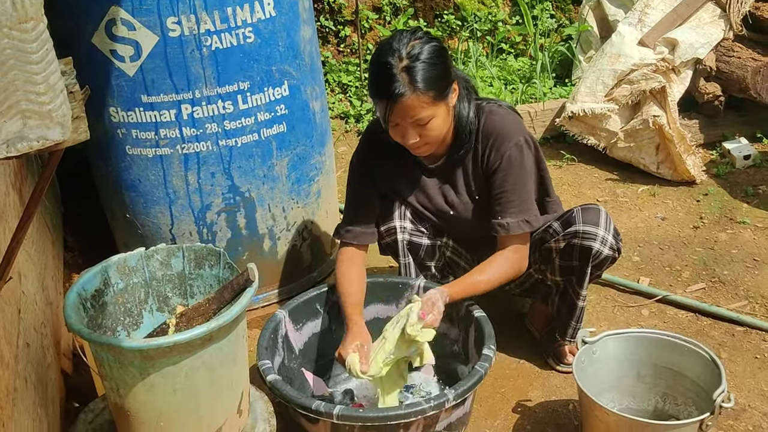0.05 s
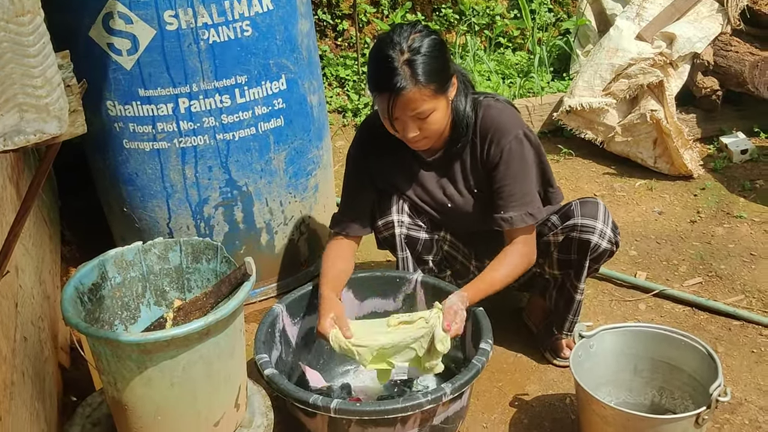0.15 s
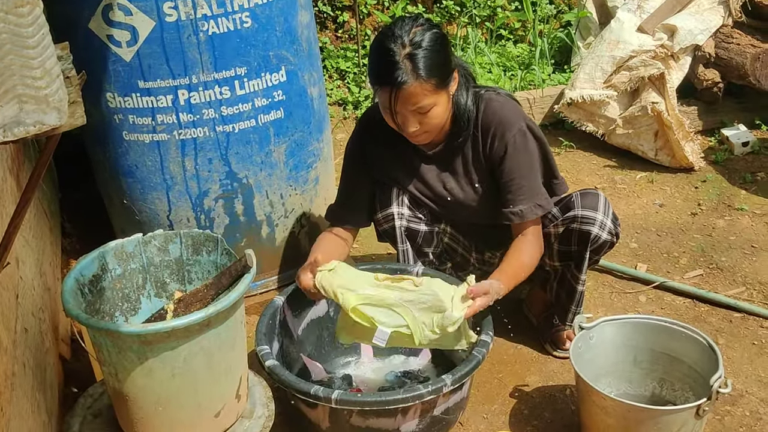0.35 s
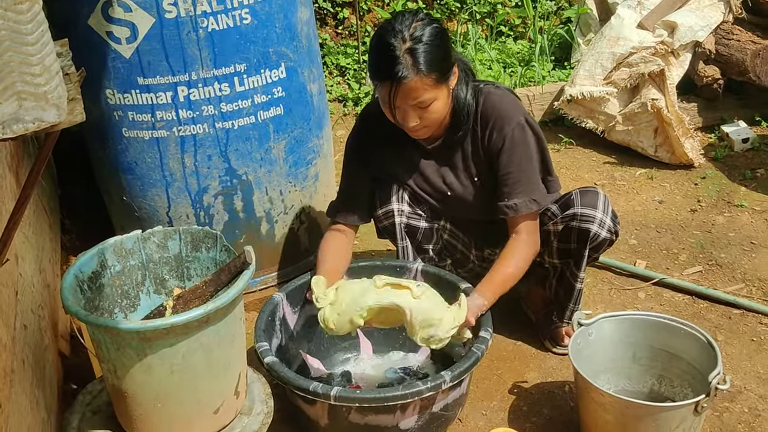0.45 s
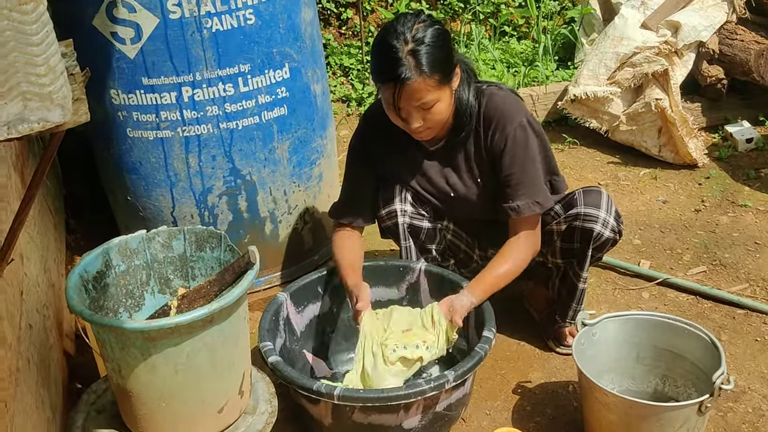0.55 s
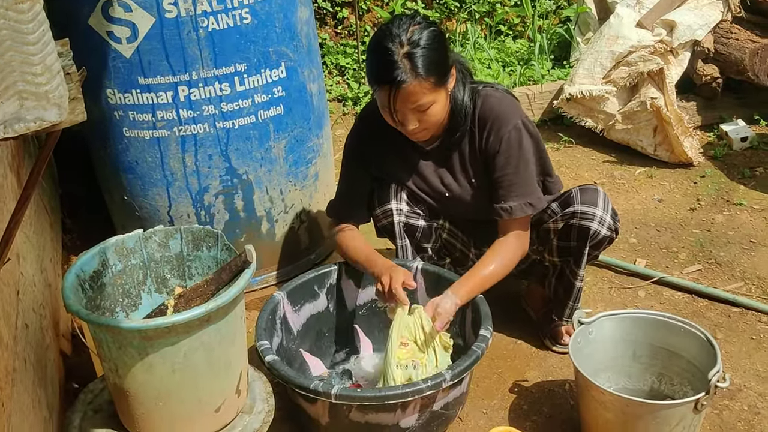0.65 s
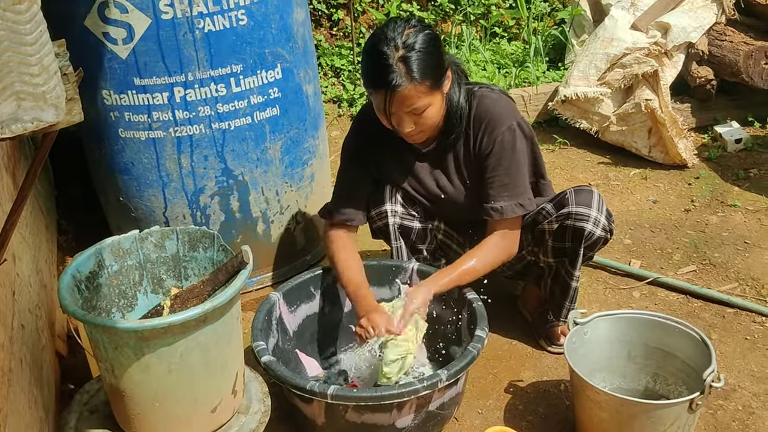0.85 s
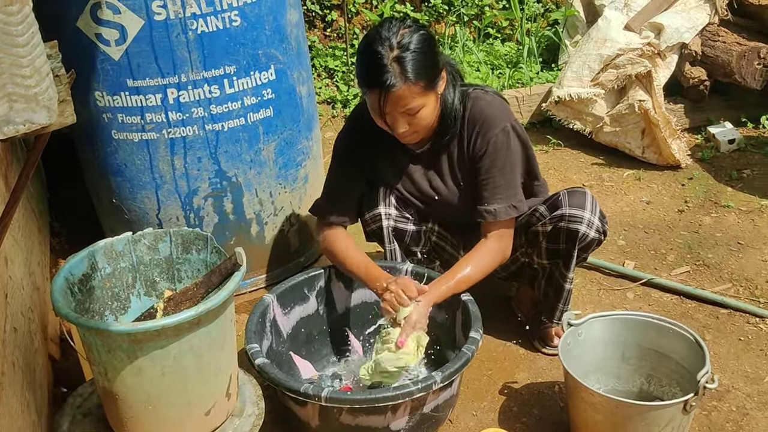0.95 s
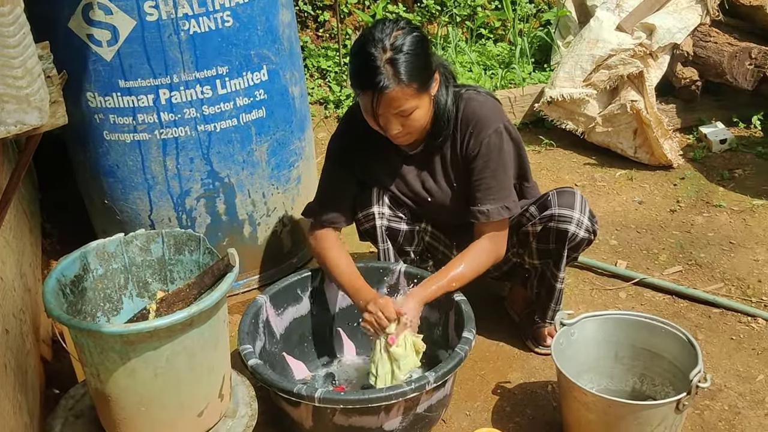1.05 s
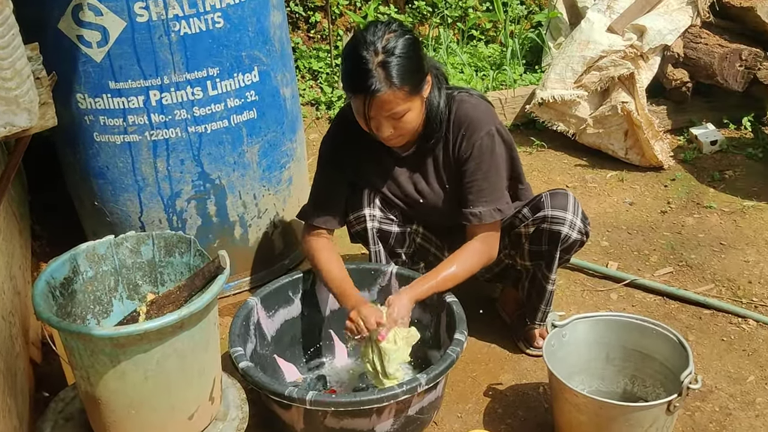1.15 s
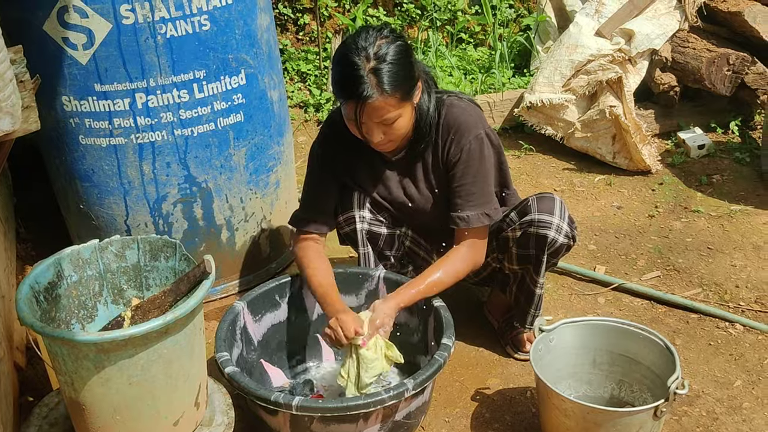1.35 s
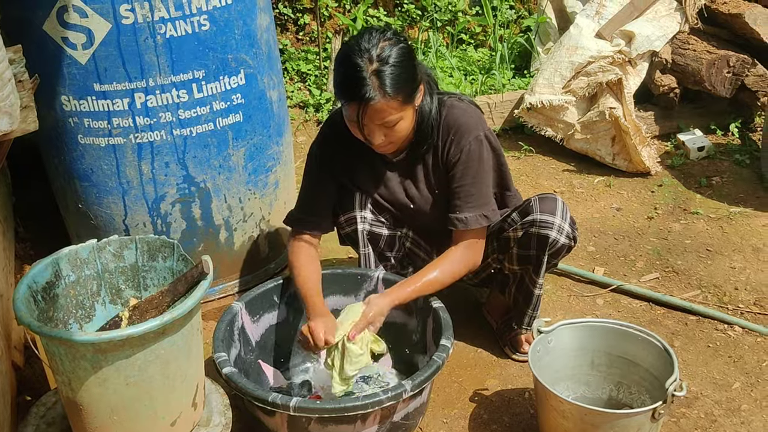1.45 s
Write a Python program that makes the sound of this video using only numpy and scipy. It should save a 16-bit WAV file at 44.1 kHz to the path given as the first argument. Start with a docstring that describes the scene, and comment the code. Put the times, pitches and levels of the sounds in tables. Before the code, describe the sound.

Hand washing of cloth in a plastic basin, with quick wet squelches and popping foam.

```python
"""A wet cloth is opened out, then scrubbed by hand in a plastic basin of suds, outdoors.
Each stroke squeezes out a squelch of tiny bursting bubbles and a fizz of foam, and rings the basin.
Larger bubbles snap, water squirts through the folds and slops underneath. Early on, a puff of air
buffets the left microphone port. A far engine drones under a soft outdoor hiss."""
import sys
import numpy as np
from scipy import signal
from scipy.fft import rfft, irfft, next_fast_len
from scipy.io import wavfile
from scipy.ndimage import map_coordinates

SR = 44100
rng = np.random.default_rng(int(sys.argv[2]) if len(sys.argv) > 2 else 0)


def materialize(psi):
    """Save the field psi as 16-bit PCM at rate SR to the path in sys.argv[1].

    A 1-D psi becomes a single channel; in a 2-D psi each row is a channel.
    """
    bounded = np.clip(np.atleast_2d(psi).T, -1, 1)
    quanta = np.round(bounded * 32767).astype(np.int16)
    wavfile.write(sys.argv[1], SR, quanta)


N = 66150
T = np.arange(N) / SR
FFT_SIZE = 2 * next_fast_len(N)
BUBBLES_PER_S = 3500


def amp(db):
    """Decibels to gain."""
    return 10 ** (np.asarray(db) / 20)


def unit(x):
    """Scale to rms 1."""
    return x / np.sqrt(np.mean(x ** 2) + 1e-20)


def fader(rows):
    """A gain ride through (time [s], level [dB]) points."""
    return amp(np.interp(T, *np.transpose(rows)))


def wobble(knots_per_s):
    """A smooth random drift."""
    return map_coordinates(rng.standard_normal(400), [T * knots_per_s], mode="wrap")


def swell(peak, rise, fall):
    """A smooth attack to 1 at the peak time, then a decay of 20 dB per fall time."""
    return np.where(T < peak, np.exp(-2 * ((T - peak) / rise) ** 2), amp(-20 * np.abs(T - peak) / fall))


def swells(rows, column):
    """One swell a row, at the level in the given column, summed in power."""
    return np.sqrt(sum((amp(row[column]) * swell(*row[:3])) ** 2 for row in rows))


def pops(per_s, spread_db):
    """Bubbles bursting at random moments with uneven sizes, rms 1."""
    size = amp(spread_db * np.clip(rng.standard_normal(N), -2, 2))
    return unit((rng.random(N) < per_s / SR) * size * rng.choice([-1, 1], N))


def ring(x, hz, width_hz):
    """One resonance with a gain of 1 at its centre."""
    return signal.lfilter(*signal.iirpeak(hz, hz / width_hz, fs=SR), x)


def eq(x, rows):
    """Minimum-phase EQ: white input of rms 1 takes on the rows' dB/Hz, one channel per level column."""
    hz, *channels = np.transpose(rows)
    log_hz = np.log(np.fft.rfftfreq(FFT_SIZE, 1 / SR) + 1)
    gain = amp([np.interp(log_hz, np.log(hz), db) for db in channels])
    cepstrum = irfft(np.log(gain), FFT_SIZE)
    cepstrum[:, 1:FFT_SIZE // 2] *= 2
    cepstrum[:, FFT_SIZE // 2 + 1:] = 0
    return irfft(rfft(x, FFT_SIZE) * np.exp(rfft(cepstrum)), FFT_SIZE)[:, :N] * np.sqrt(SR / 2)


def basin_scatter(x, wet_db, spots=2, t60_s=0.024):
    """Bubbles lie at several spots, each with its direct sound and a short scatter off the basin wall."""
    t = T[:SR // 20]
    response = rng.standard_normal((spots, 2, len(t))) * amp(-60 * t / t60_s)
    response *= amp(wet_db) / np.linalg.norm(response, axis=2, keepdims=True)
    response[:, :, 0] += [amp(-7.5), 1]  # direct sound: the left port faces away from the basin
    response /= np.linalg.norm(response, axis=2, keepdims=True)
    sends = x * (rng.integers(spots, size=N) == np.arange(spots)[:, None])
    return signal.fftconvolve(sends[:, None], response, axes=2).sum(axis=0)[:, :N]


def suction(start, width):
    """The pressure dip of one eddy passing the port, with a 35 Hz low cut."""
    age = np.maximum(T - start, 0) / width
    return signal.lfilter(*signal.butter(1, 35, "high", fs=SR), -age * np.exp(1 - age))


# scrubbing strokes (peak time [s], rise [s], fall [s], basin ring [dB], squelch [dB], foam [dB])
STROKES = [(.512, 0.015, 0.025, -10, -10.5, -11), (.641, 0.018, 0.027, -20, -3, -8.5),
           (.720, 0.017, 0.048, 2, -4, -24), (.746, 0.013, 0.047, -13, 2, -1),
           (.772, .008, 0.022, -4, -0.5, 0.5), (.782, 0.0023, 0.04, 10, 4, 4),
           (0.819, 0.028, 0.031, -10, 2, -10), (.85, 0.028, 0.043, -15, -11, -9),
           (0.923, 0.028, 0.039, 1.5, -5.5, -5), (.945, 0.021, 0.044, 1, 1, -1),
           (.992, .02, 0.081, -28, -17, -11), (1.030, 0.016, .025, -4, 0.5, -5),
           (1.057, 0.029, 0.041, -1, 1.5, -2.5), (1.085, 0.016, 0.017, -20, -1, 1),
           (1.195, 0.044, 0.023, -13, -10, -4), (1.220, 0.035, .035, -11, -3, -6),
           (1.302, 0.02, 0.1, -28, -5.5, -5), (1.357, 0.021, .035, -25, -13, -1.5),
           (1.43, 0.035, 0.098, -11, -18, -10.5), (1.495, 0.034, 0.028, -23, -14.5, -10)]
# suds settling (time [s], level [dB])
SUDS_FADER = [(0, -10.5), (.1, -19), (.25, -11), (.4, -17.5), (.6, -17.5), (.7, -12.5), (1.1, -13),
              (1.5, -13.5)]
# bright sizzle of foam (frequency [Hz], left [dB/Hz], right [dB/Hz])
FOAM_EQ = [(2080, -110, -110), (4360, -88.5, -88), (5500, -86.5, -74.5), (6240, -83, -67),
           (6570, -83, -64.5), (7670, -95, -71), (8360, -89, -82), (11100, -101, -91), (15000, -103, -99)]


def foam():
    """Foam bursts under each stroke, and the suds keep fizzing in between."""
    envelope = np.hypot(swells(STROKES, column=5), fader(SUDS_FADER))
    fizz = envelope * pops(per_s=2000, spread_db=7)
    return eq(basin_scatter(fizz, wet_db=3.5), FOAM_EQ)


# open-air bed (frequency [Hz], left [dB/Hz], right [dB/Hz])
OUTDOOR_EQ = [(20, -97, -70), (73, -78, -69), (131, -81, -78), (320, -83, -86), (507, -91.5, -89),
              (1400, -94.5, -93), (2220, -92.5, -88.5), (4600, -93.5, -95.5), (6360, -86.5, -98),
              (7530, -89.5, -88.5), (8550, -99, -97), (14600, -103, -104)]


def outdoor_hiss():
    """A soft, wide bed of steady open-air noise."""
    return eq(rng.standard_normal((2, N)), OUTDOOR_EQ)


# low engine orders (frequency [Hz], rms level on the right [dB])
ENGINE_ORDERS = [(56, -51), (83, -59.5), (197, -64.5)]


def far_engine():
    """The low orders of a far engine drone, wavering in level and phase."""
    drone = np.zeros(N)
    for hz, db in ENGINE_ORDERS:
        gain = np.sqrt(2) * amp(db + 2.56 * wobble(6.07))
        drone += gain * np.sin(2 * np.pi * hz * T + 0.73 * wobble(5.93))
    return drone * amp([[-1], [0]])


# dull bumps of air (time [s], width [s], level [dB])
AIR_BUMPS = [(.004, 0.0044, -21), (0.051, 0.0036, -28.5), (.203, 0.00056, -24), (.237, 0.0026, -8),
             (0.254, 0.0039, -11.5)]


def air_bumps():
    """Single eddies thump the port before the puff and as it builds."""
    return sum(amp(db) * suction(start, width) for start, width, db in AIR_BUMPS)


# wet snaps, levels before the boost (time [s], tick [dB], body [dB])
SNAPS = [(0.067, -8.5, -16.5), (0.123, -18, -10), (.6355, -2, -22), (0.7411, 3.5, -7), (.7515, 0.5, -12),
         (0.7786, 5, 7), (.781, 3.5, -6), (.8182, -2, 2), (.8222, -4.5, 1), (0.9326, 5.5, -26),
         (1.052, -8, -3), (1.176, -5, -20), (1.1882, 6, -5), (1.1912, 3, -7), (1.2524, -9, -13),
         (1.293, -2, -4)]


def snaps(boost_db=22):
    """Larger bubbles burst in the open: a tick with the foam's tone, a body with the squelch's."""
    ticks, bodies = np.zeros((2, N))
    for time, tick_db, body_db in SNAPS:
        ticks[round(time * SR)] += amp(tick_db + boost_db)
        bodies[round(time * SR)] += amp(body_db + boost_db)
    return eq(basin_scatter(ticks, wet_db=2), FOAM_EQ) + eq(basin_scatter(bodies, wet_db=2), SQUELCH_EQ)


# spurts (peak time [s], rise [s], fall [s], pitch [Hz], level [dB], left minus right [dB])
SQUIRTS = [(.068, 0.002, 0.017, 2320, -47, -8), (.069, .003, 0.013, 5500, -62, 6),
           (.86, 0.022, 0.084, 2590, -59, 7), (1.294, 0.0059, 0.066, 4700, -40.5, 0.5),
           (1.353, 0.024, 0.066, 2600, -45.5, 2), (1.46, 0.06, 0.16, 2670, -53.5, 7.5)]


def squirts(q=5.3):
    """Water squirts through a fold; like-sized bubbles give each spurt its own pitch."""
    out = np.zeros((2, N))
    for peak, rise, fall, hz, db, pan_db in SQUIRTS:
        spray = np.array([unit(ring(pops(BUBBLES_PER_S, spread_db=0.5), hz, hz / q)) for _ in range(2)])
        out += spray * swell(peak, rise, fall) * amp([[db + pan_db / 2], [db - pan_db / 2]])
    return out


# water slopping (peak time [s], rise [s], fall [s], level [dB])
SLOPS = [(.125, 0.009, 0.028, 7.5), (.535, 0.12, 0.064, -2.5), (0.578, 0.016, 0.013, 1.5),
         (0.639, 0.0069, 0.023, -3.5), (.805, 0.037, 0.015, -7), (1.042, 0.0096, 0.0096, -6),
         (1.435, 0.089, 0.023, -9.5)]
# dark tone of a slop (frequency [Hz], left [dB/Hz], right [dB/Hz])
SLOP_EQ = [(100, -100, -100), (217, -75, -90), (296, -74.5, -68), (424, -80.5, -83.5), (700, -84, -91),
           (2000, -110, -110)]


def slops():
    """Water slops under the cloth in low, soft gulps."""
    return eq(swells(SLOPS, column=3) * pops(per_s=2900, spread_db=1), SLOP_EQ)


# push of the puff (time [s], level [dB])
PUFF_FADER = [(.17, -41.5), (.2, -26), (.233, -9.5), (.238, -2.5), (.246, -9.5), (.272, -6), (.295, -0.5),
              (.3, 3.5), (.319, 1), (.33, -9.5), (.342, -34), (.42, -35.5), (.46, -61)]
# bass-heavy turbulence (frequency [Hz], level [dB/Hz])
BUFFET_EQ = [(20, -36.5), (60, -43.5), (150, -48.5), (320, -48.5), (600, -53), (1100, -56.5), (1900, -57),
             (3500, -62), (6000, -75), (9000, -78.5), (15000, -77)]


def buffet():
    """The puff hits the port as a fluttering rush of turbulence."""
    flutter = amp(1.1 * wobble(221.2))
    return eq(fader(PUFF_FADER) * flutter * rng.standard_normal(N), BUFFET_EQ)[0]


# hiss at the port's edge (time [s], level [dB])
EDGE_FADER = [(.19, -22.5), (.212, -17), (.219, -1), (.24, -5), (.255, -4.5), (.29, -4), (.322, 6),
              (.345, 0.5), (.38, -7), (.42, -17.5), (.47, -31)]
# its tone (frequency [Hz], level [dB/Hz])
EDGE_EQ = [(200, -104), (800, -67.5), (1200, -73), (2500, -71.5), (4000, -67.5), (5300, -65), (6800, -72.5),
           (9000, -80), (15000, -91)]
# airy top of the puff (time [s], level [dB])
TREBLE_FADER = [(.21, -18), (.238, -4), (.275, 5), (.31, 7), (.33, -2), (.35, -4), (.42, -20)]
# its tone (frequency [Hz], level [dB/Hz])
TREBLE_EQ = [(3000, -100), (7000, -87), (10000, -82), (15500, -85.5)]


def puff_hiss():
    """Air hisses over the port's edge, with a sheen of treble on top."""
    edge = eq(fader(EDGE_FADER) * rng.standard_normal(N), EDGE_EQ)[0]
    treble = eq(fader(TREBLE_FADER) * rng.standard_normal(N), TREBLE_EQ)[0]
    return edge + treble


def eddies(start_s=0.274, start_per_s=95, start_width_s=0.0012, doubling_s=0.055):
    """The puff drives sixteen eddies past the port, tighter and shorter as they speed up."""
    speed = 2 ** np.clip((T - start_s) / doubling_s, -1, 2)
    turns = np.cumsum(speed) * start_per_s / SR
    turns -= np.interp(start_s, T, turns)
    dips = np.zeros(N)
    for k, (jitter, size) in enumerate(rng.standard_normal((16, 2))):
        time = np.interp(k + 0.207 * jitter, turns, T)
        dips += amp(-9 + 2.2 * size) * suction(time, start_width_s / np.interp(time, T, speed))
    return fader(PUFF_FADER) * dips


# wet midrange of the cloth (frequency [Hz], left [dB/Hz], right [dB/Hz])
SQUELCH_EQ = [(300, -105, -105), (600, -95, -88), (1300, -87, -82), (1760, -81.5, -73.5),
              (2600, -76, -76.5), (3670, -88, -78.5), (5330, -78.5, -81.5), (8300, -106, -79),
              (14500, -112, -104)]


def squelch():
    """Each stroke squeezes the cloth and bursts a crowd of tiny bubbles in it."""
    bubbles = swells(STROKES, column=4) * pops(BUBBLES_PER_S, spread_db=4)
    return eq(basin_scatter(bubbles, wet_db=1, spots=4), SQUELCH_EQ)


# modes of the plastic basin (frequency [Hz], width [Hz], level on the right in a 0 dB stroke [dB/Hz])
BASIN_MODES = [(720, 70, -74), (884, 54, -74.5), (1140, 82, -75.5), (1540, 110, -81.5)]


def basin_ring():
    """Each stroke rings the basin's hollow modes with a patter of small knocks."""
    patter = np.array([pops(BUBBLES_PER_S, spread_db=1) for _ in range(2)])
    knocks = swells(STROKES, column=3) * patter
    hollow = sum((-1) ** k * amp(db) * ring(knocks, hz, width)
                 for k, (hz, width, db) in enumerate(BASIN_MODES))
    return hollow * np.sqrt(SR / 2) * amp([[-2.5], [0]])


def scene():
    """The washing up front, the air hard left, the engine and hiss behind."""
    washing = basin_ring() + squelch() + foam() + snaps() + squirts() + slops()
    air = (air_bumps() + eddies() + buffet() + puff_hiss()) * amp([[0], [-38]])
    return washing + air + far_engine() + outdoor_hiss()


def record(dry, top_hz=15850):
    """A brick-wall high cut on the mix."""
    passband = np.fft.rfftfreq(FFT_SIZE, 1 / SR) < top_hz
    return irfft(rfft(dry, FFT_SIZE) * passband, FFT_SIZE)[:, :N]


dry = scene()
out = record(dry)
materialize(out)
```